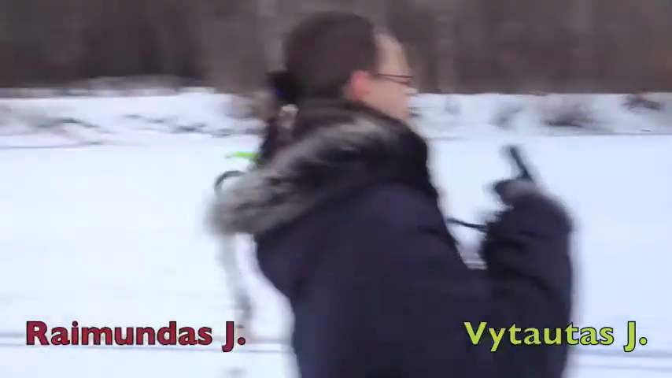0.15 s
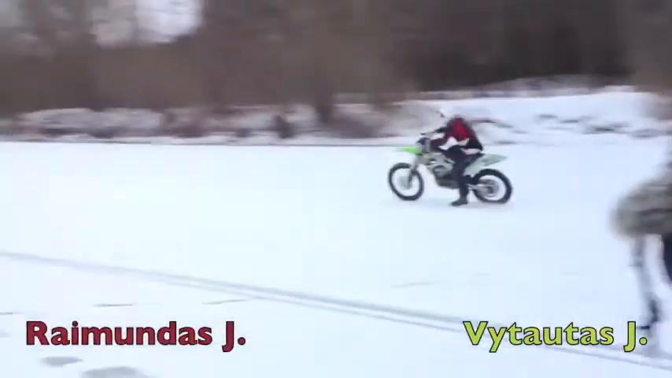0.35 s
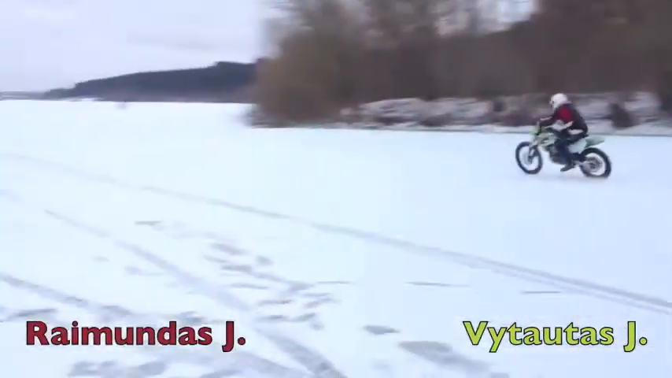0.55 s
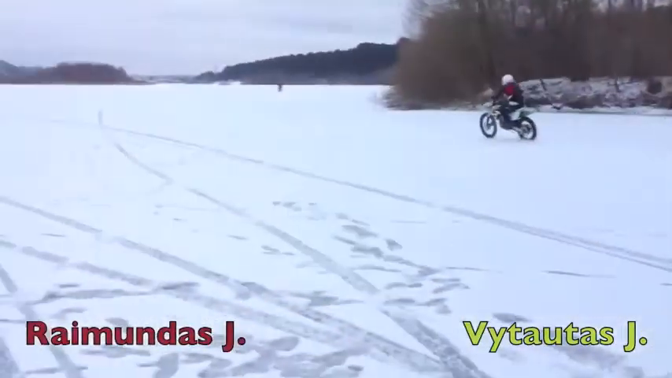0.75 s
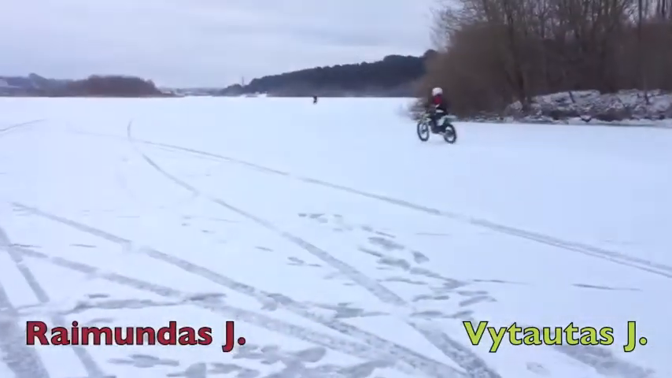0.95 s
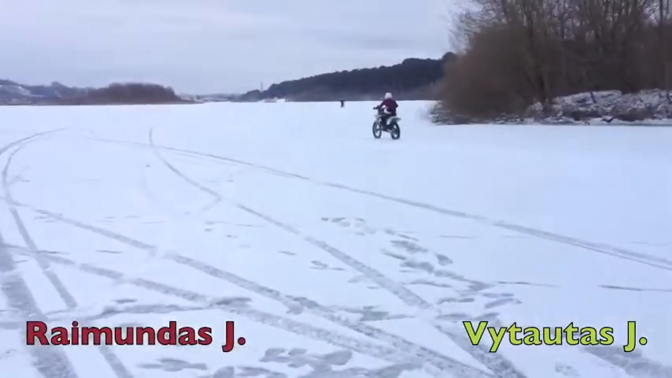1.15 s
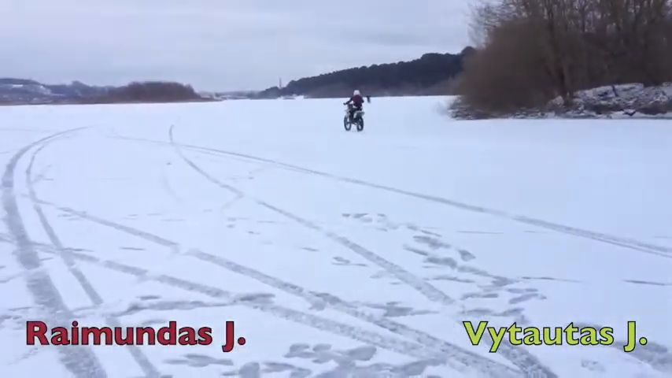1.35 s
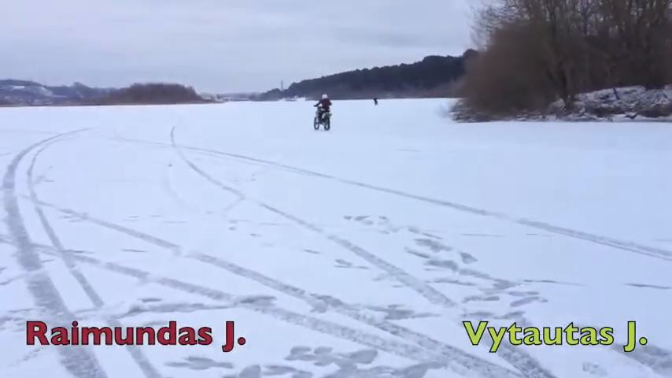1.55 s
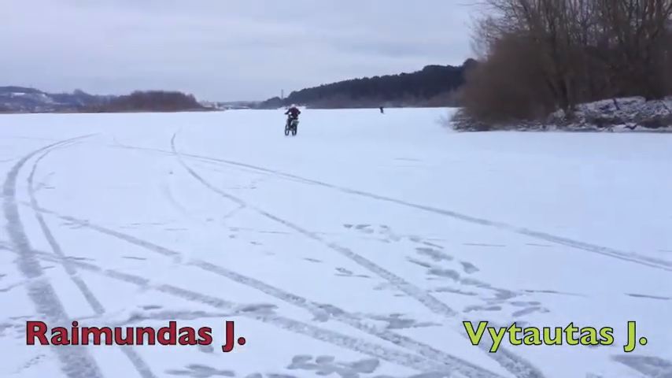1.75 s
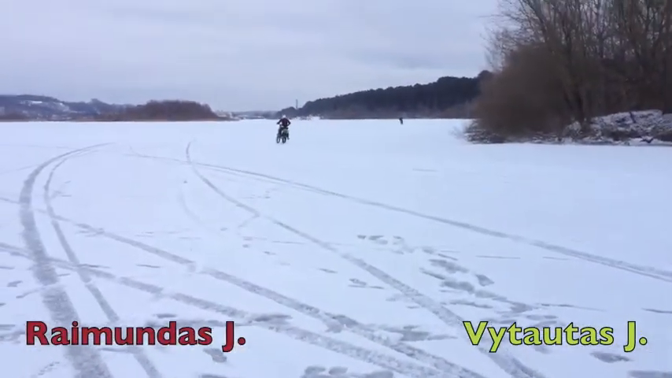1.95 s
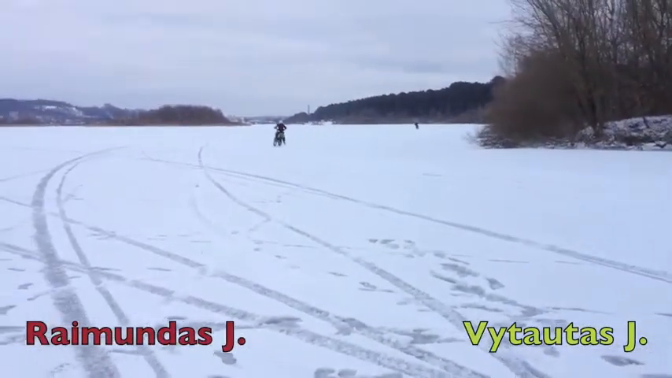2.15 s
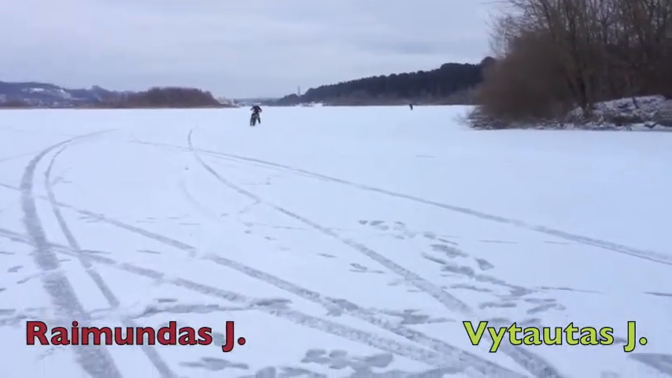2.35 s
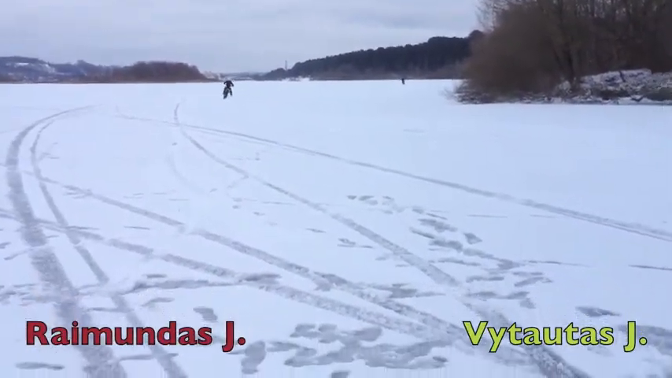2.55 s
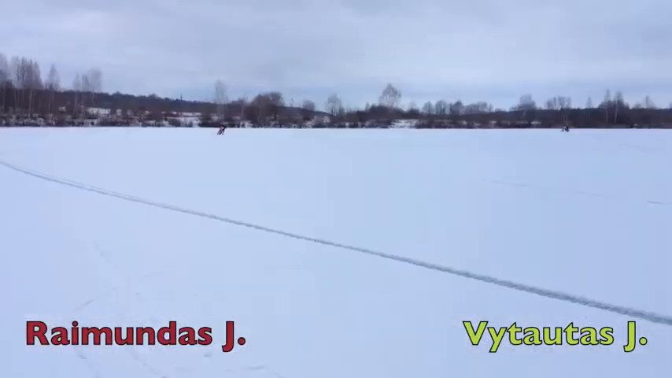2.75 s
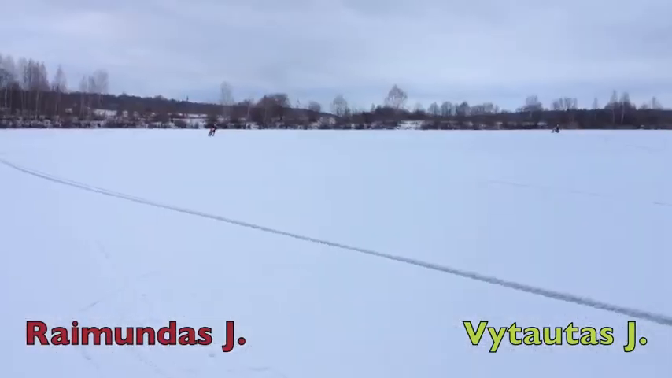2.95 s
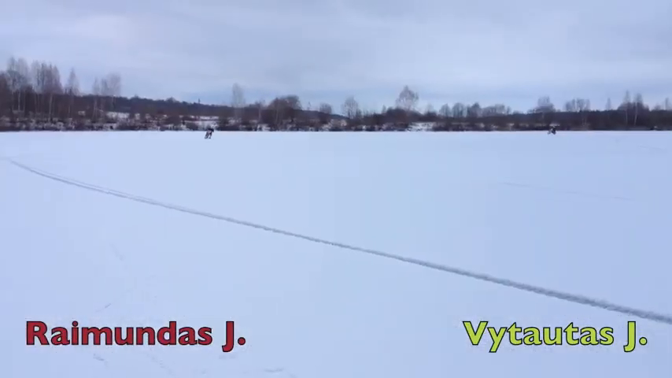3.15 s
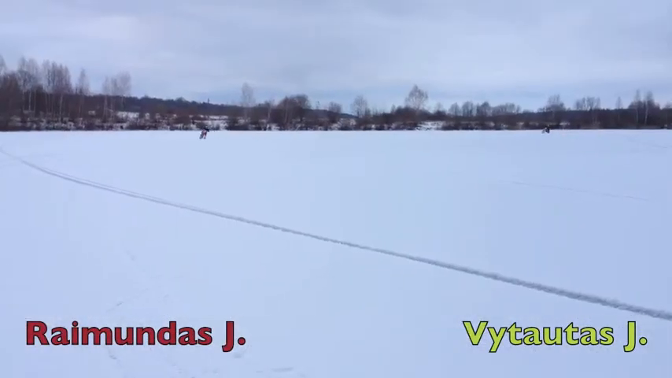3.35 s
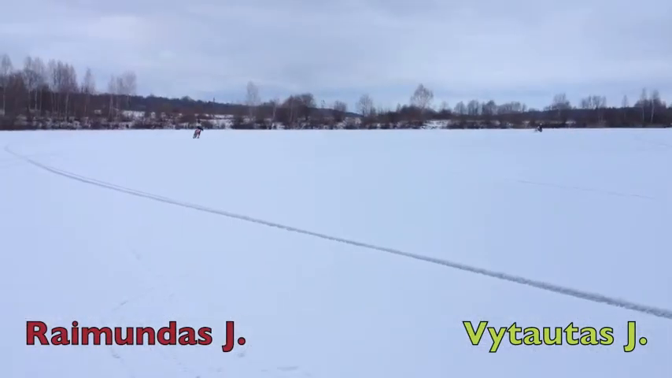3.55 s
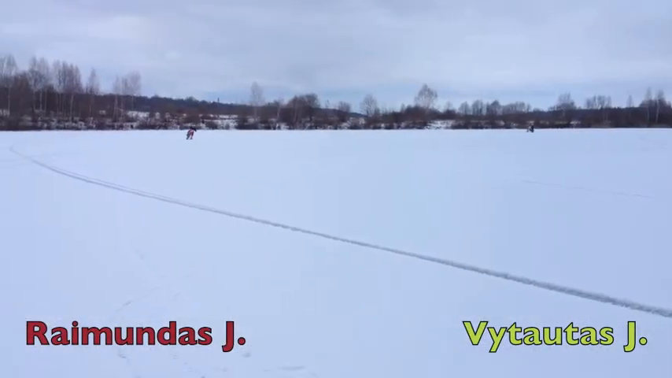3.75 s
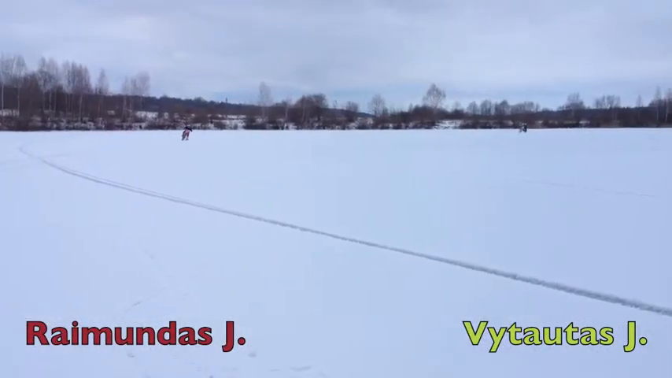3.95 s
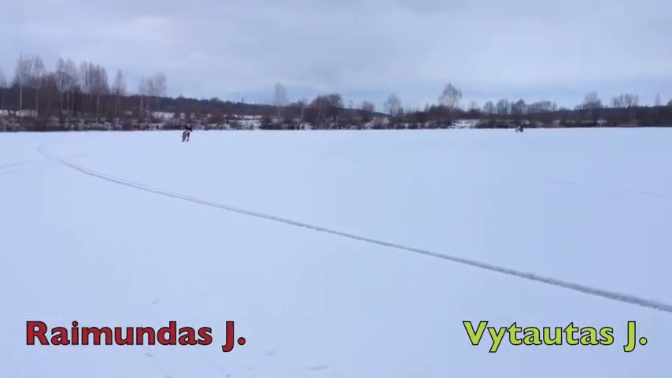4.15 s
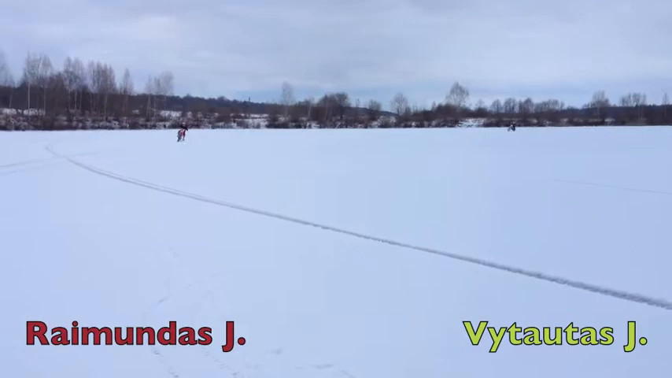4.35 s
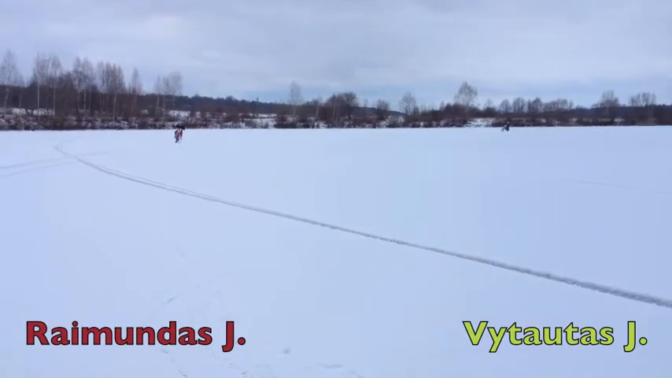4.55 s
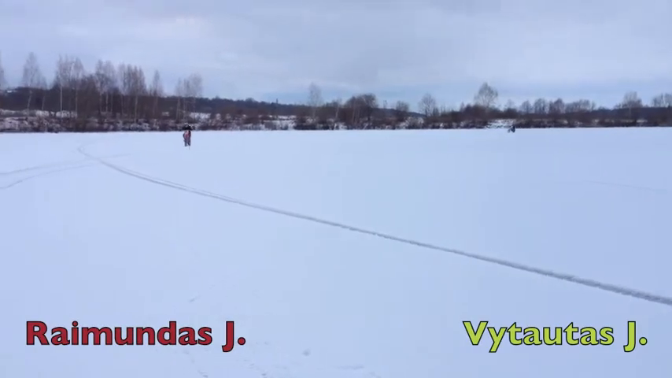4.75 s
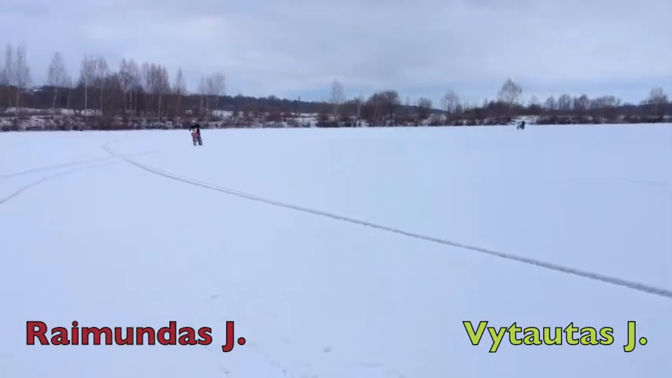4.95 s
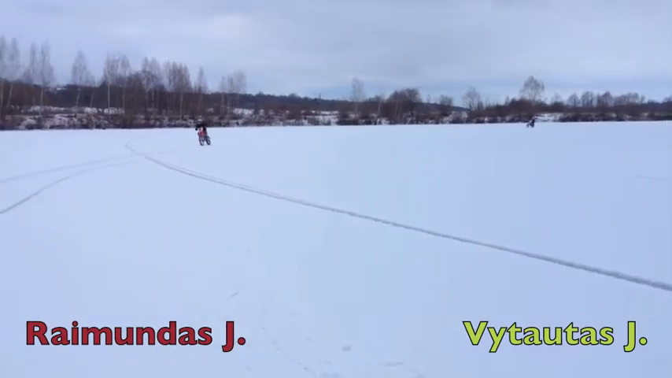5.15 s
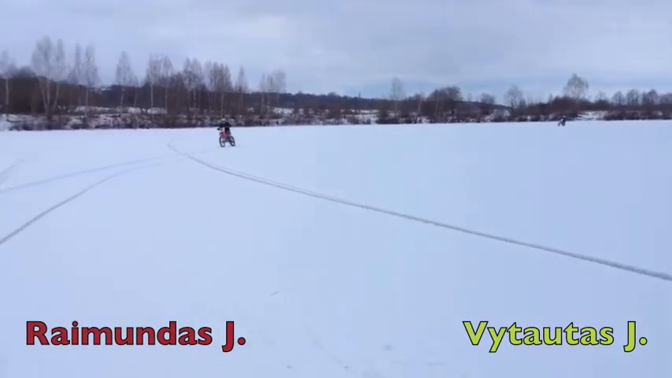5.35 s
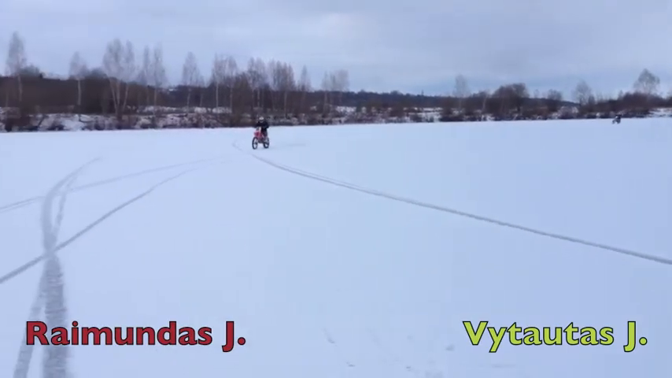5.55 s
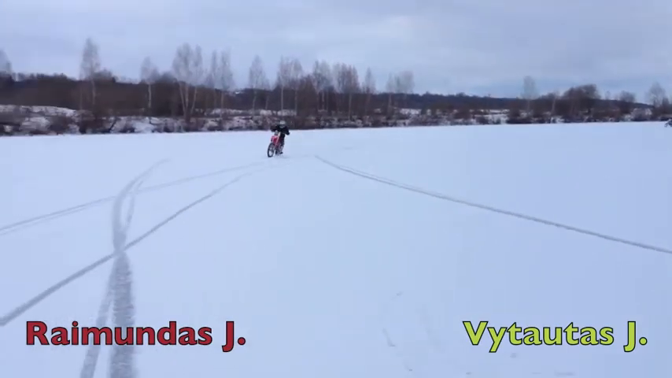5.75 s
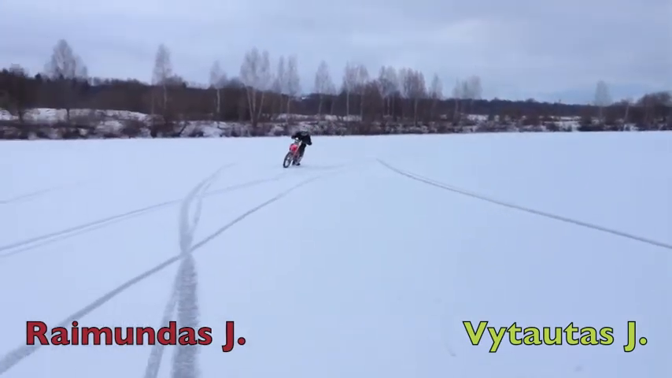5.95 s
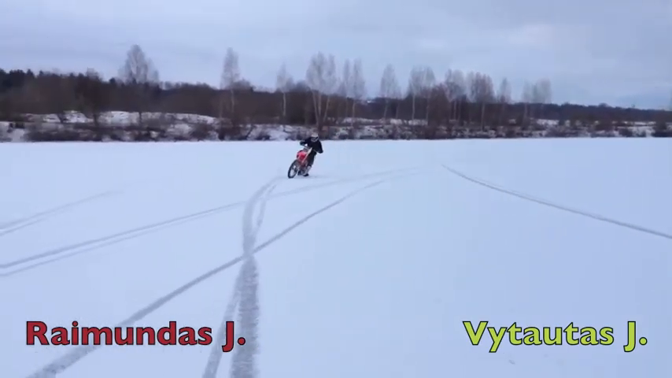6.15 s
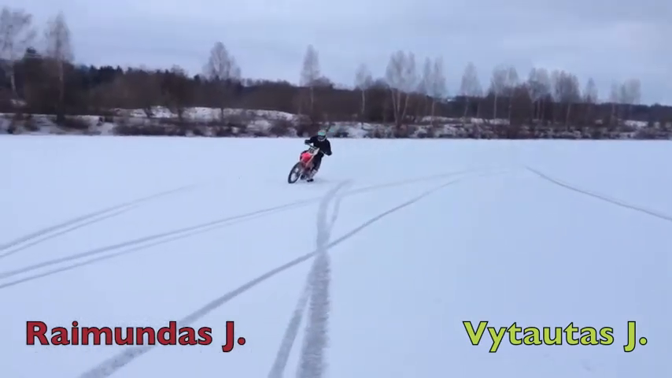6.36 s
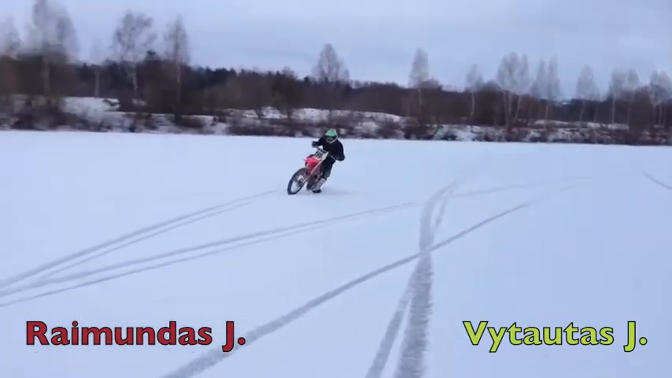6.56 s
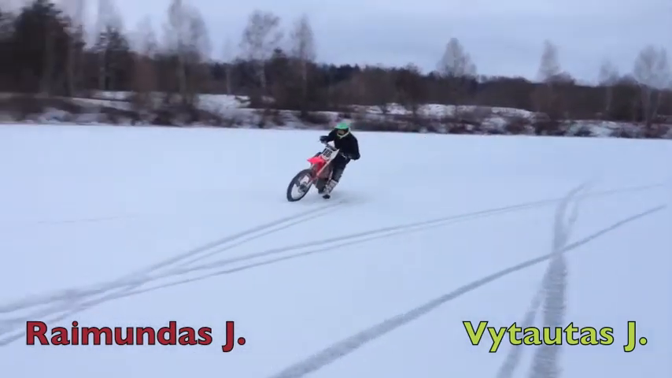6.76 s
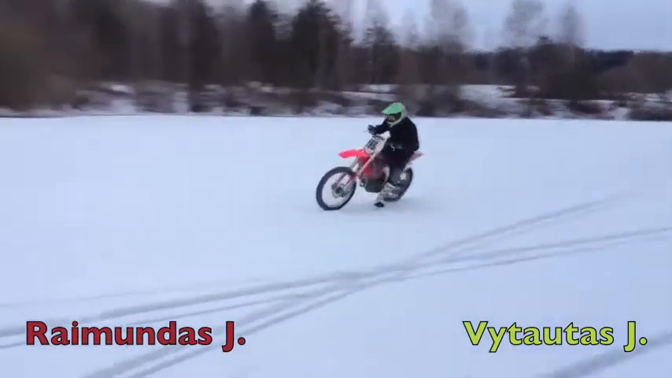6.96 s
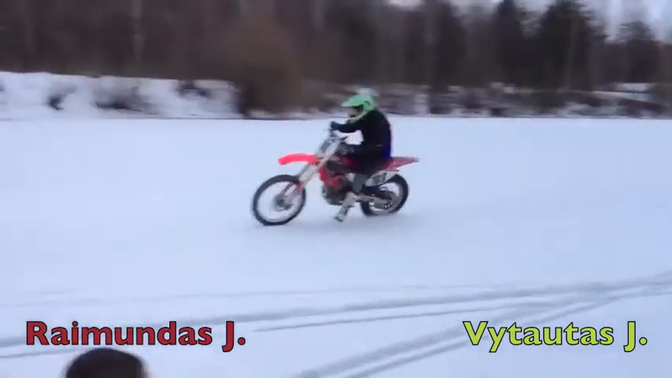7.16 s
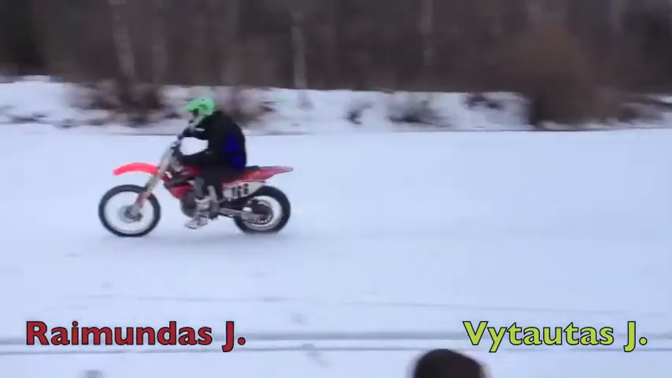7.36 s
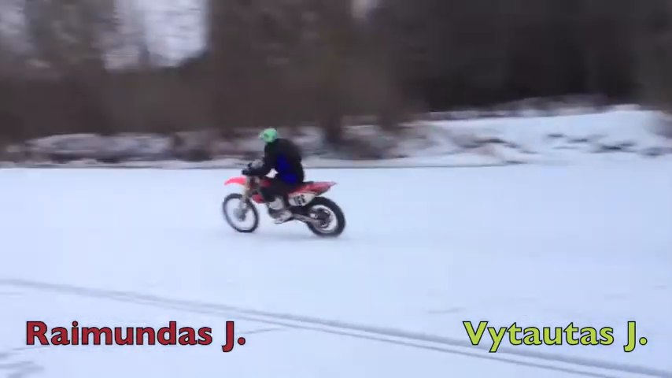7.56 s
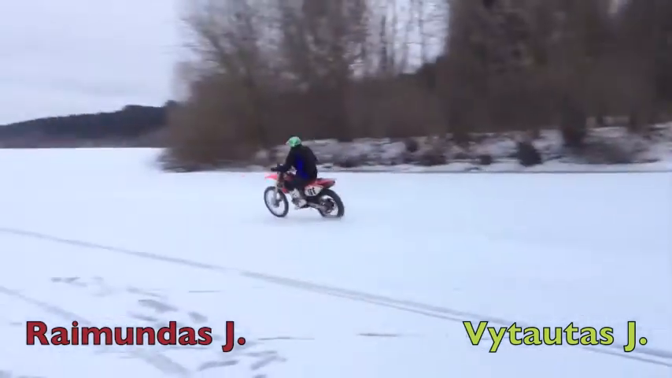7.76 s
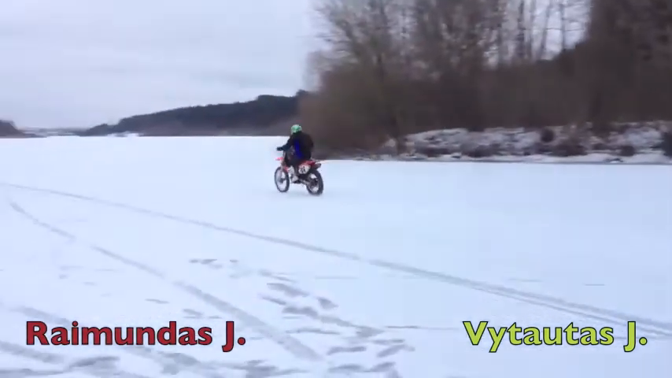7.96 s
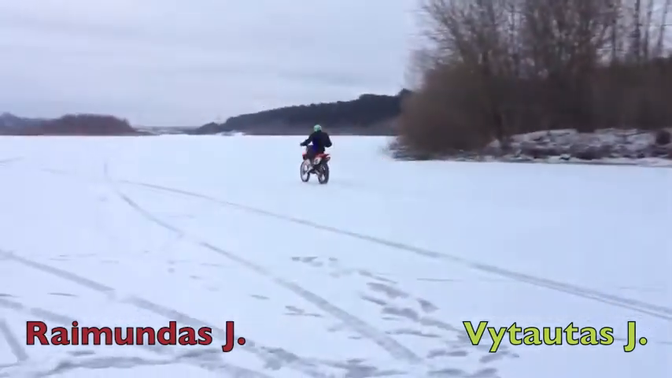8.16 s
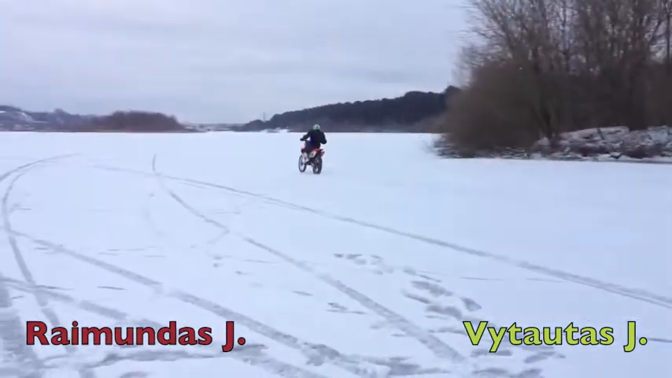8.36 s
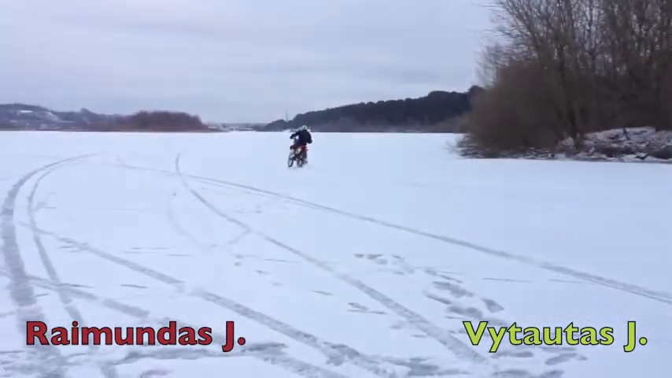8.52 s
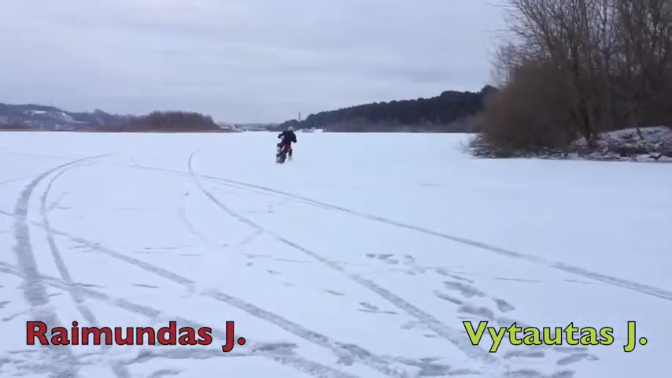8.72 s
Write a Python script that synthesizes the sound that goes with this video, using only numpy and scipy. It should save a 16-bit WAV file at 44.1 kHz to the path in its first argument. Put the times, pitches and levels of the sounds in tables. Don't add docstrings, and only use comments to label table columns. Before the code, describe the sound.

A harsh four-stroke motorcycle drone starts near and moves off across open snow, falls suddenly quieter and lower, pops, and pulls again. The sound cuts to another bike, distant and higher, growing louder with gear whine and tyre roar. It blips off throttle, sweeps past, turns to sharper exhaust crackle, slows, then accelerates away. Faint distant engine hum and light wind reach a small microphone.

```python
import sys
import numpy as np
from scipy import signal
from scipy.fft import rfft, irfft, next_fast_len
from scipy.io import wavfile
from scipy.ndimage import uniform_filter1d, map_coordinates

SR = 44100
rng = np.random.default_rng(int(sys.argv[2]) if len(sys.argv) > 2 else 0)


def put_to_file(sound):
    columns = np.atleast_2d(sound).T
    safe = np.clip(columns, -1, 1)
    whole_steps = np.round(safe * 32767)
    wavfile.write(sys.argv[1], SR, whole_steps.astype(np.int16))


def voltage_ratio(level):
    return 10 ** (np.asarray(level, float) / 20)


N = 387638
CUT = 2.619


def evened(x):
    return x / np.sqrt(np.mean(x ** 2) + 1e-20)


def columns(rows):
    s, *values = np.transpose(rows)
    return [np.interp(np.arange(N) / SR, s, v) for v in values]


def shaped(x, points, lo_hz=0, hi_hz=SR, soft=.09):
    size = next_fast_len(N)
    log_hz = np.log(np.fft.rfftfreq(size, 1 / SR) + 1)
    f, db = np.transpose(points)
    lower = np.tanh((log_hz - np.log(lo_hz + 1)) / soft)
    upper = np.tanh((log_hz - np.log(hi_hz)) / soft)
    band = np.sqrt((lower - upper) / 2)
    gain = band * voltage_ratio(np.interp(log_hz, np.log(f + 1), db))
    return irfft(rfft(x, size) * gain, size)[:N]


def causal(x, points):
    log_hz = np.log(abs(np.fft.fftfreq(4096, 1 / SR)) + 1)
    f, db = np.transpose(points)
    log_gain = np.log(voltage_ratio(np.maximum(np.interp(log_hz, np.log(f + 1), db), -70)))
    taps = np.fft.ifft(np.exp(np.conj(signal.hilbert(log_gain)))).real[:2048]
    return signal.oaconvolve(x, taps)[:N]


def drift(seconds):
    size = max(round(seconds * SR / 64), 2)
    slow = uniform_filter1d(uniform_filter1d(rng.standard_normal(N // 64 + 2), size), size)
    return np.interp(np.arange(N) / 64, np.arange(len(slow)), evened(slow))


def controls():
    # t/s, rate/Hz
    speed = [
        [(0, 69.1), (.29, 69.2), (.5, 68.9), (.83, 68.7), (1, 71.3), (1.39, 67.4), (1.44, 62.9), (1.5, 57.2),
         (1.66, 50.1), (2.1, 47.3), (2.2, 51.2), (2.36, 56.7), (2.49, 60.6), (2.58, 60.8), (2.62, 62.3)],
        [(2.62, 66.34), (2.88, 69.34), (3.44, 68.53), (3.87, 74.88), (4.35, 75.61), (4.68, 74.46),
         (4.99, 61.24), (5.08, 65.5), (5.16, 71.72), (5.4, 79.42), (5.61, 74.52), (6.74, 75.79), (7.12, 71.89),
         (7.86, 65.31), (8.0, 54.6), (8.26, 55.5), (8.57, 59.49), (8.79, 67.66)],
    ]
    # t/s, level/dB, distance/m, exhaust facing the microphone/0-1, wheelspin/0-2
    ride_away = [(0, -33.5, 8.1, 0.81, 0.8), (.15, -36, 6.2, 0.84, 0.26), (.3, -28.5, 7.5, 0.81, 0.86),
                 (.5, -34.5, 13.5, .9, 0.14), (.8, -33.5, 19.5, 0.96, 0.28), (1, -36.5, 21.4, 0.92, 0.2),
                 (1.2, -36.5, 63, 0.87, 0.15), (1.38, -39, 53, .94, 0.16), (1.45, -48.5, 33, 0.65, 0.076),
                 (1.7, -53.5, 31, 0.88, 0.34), (2.1, -53, 31, 1, 0.62), (2.25, -44.5, 38, 0.72, 1.5),
                 (2.4, -38, 33, 0.7, 1.6), (2.5, -38.5, 47, 0.81, 1.54), (2.62, -43, 110, .68, 2.1)]
    ride_past = [(2.62, -44, 146, 0.07, 1.1), (3.0, -44.5, 117, 0.073, 0.57), (3.5, -41, 138, 0.083, 0.72),
                 (4.3, -37.5, 122, 0.3, 1.15), (4.7, -35.5, 108, 0.16, 0.46), (5.0, -37, 60, 0.35, 0.22),
                 (5.2, -35.5, 57, 0.33, 0.21), (5.4, -34.5, 42, 0.34, 0.25), (5.6, -38, 29, 0.26, 0.0061),
                 (6.2, -30.5, 40, 0.12, 0.27), (6.8, -29, 21.2, 0.08, 0.27), (7.15, -31, 2.1, 0.53, 0.068),
                 (7.45, -33.5, 7.7, 0.83, 0.071), (7.85, -36, 11.7, 0.89, 0.073),
                 (8.05, -39.5, 36, 0.41, 0.44), (8.35, -38.5, 35, 0.82, 0), (8.55, -37.5, 61, 0.93, 0.29),
                 (8.79, -37, 66, 0.95, 0.48)]
    # opens t/s, shuts t/s
    openings = [
        (-1, 1.395),
        (2.2, 4.71),
        (5.03, 7.885),
        (8.25, 10),
    ]
    # t/s, share of full throttle/1
    pops = [
        (1.48, .8),
        (2.172, 1),
    ]
    opening_s, shutting_s, pop_s = .1, .022, .015
    shut_facing = .45
    t = np.arange(N) / SR
    level_db, metres, facing, spin = columns(np.vstack([ride_away, ride_past]))
    throttle = 0
    for opens, shuts in openings:
        rise = np.clip((t - opens) / opening_s, 0, 1)
        throttle = throttle + rise * np.clip(1 + (shuts - t) / shutting_s, 0, 1)
    for s, share in pops:
        throttle = throttle + share * np.exp(-((t - s) / pop_s) ** 4)
    throttle = np.clip(throttle, 0, 1)
    clear = throttle + shut_facing * (1 - throttle)
    return dict(rate=columns(np.vstack(speed))[0], level_db=level_db, metres=np.maximum(metres, 3),
                behind=np.clip(facing, 0, 1), spin=np.clip(spin, 0, 3), shut=1 - throttle,
                facing=np.clip(facing * clear, .05, .97))


def pipe(turns, ride):
    # f/Hz, level/dB from the front, level/dB from behind
    pipe_gain = [(90.0, -12, -9.5), (140.0, 5.5, 7.7), (198.4, -2, 9), (232.6, 12.5, 10), (291.6, 11.5, 9),
                 (339.5, -5.5, 11.5), (455, -17, -2), (600.0, -27, -10.5)]
    # t/s, half length/s, f/Hz, level/dB
    lobes = [(0, 0.84, 394, -16.5), (0.127, .15, 257, 13.5), (0.79, 0.37, 246, -13), (1.78, 0.5, 148, 11),
             (2.15, 0.48, 248, -7), (3.89, 0.83, 216, 3), (4.89, 0.13, 303, -22), (5.28, 0.24, 228, 9.5),
             (6.418, 0.8, 377, 11.5), (7.605, 0.24, 216, -20), (0.48, 0.11, 605, -2), (3.1, 0.26, 420, 2),
             (4.2, 0.95, 524, -29), (5.4, 0.29, 600, 0), (6.414, 0.64, 605, 17.5), (7.28, 0.13, 400, -15),
             (7.49, 0.3, 760, 15), (8.4, 0.22, 464, 6), (7.95, 0.041, 258, -0.5), (0, .15, 152, 3.5),
             (8.75, 0.22, 600, 7.5)]
    # f/Hz, level/dB per Hz
    rumble = [(12, -84), (20, -74), (92, -18), (135, -2), (222, 1.5), (256, 0.5), (295, -1), (541, -21),
              (900, -16.5), (1170, -33), (1980, -120)]
    lobe_width = .19
    rate, t = ride["rate"], np.arange(N) / SR
    slow, slow_rate = t[::64], rate[::64]
    ahead = np.clip(np.maximum((.6 - ride["facing"]) / .3, 2 * ride["spin"] - 1.8), 0, 1)
    hz, front_db, behind_db = np.transpose(pipe_gain)
    tones, power = 0, 0
    for k in range(1, 13):
        order_hz = k * rate
        front = np.interp(np.log(order_hz), np.log(hz), front_db)
        behind = np.interp(np.log(order_hz), np.log(hz), behind_db)
        db = ride["level_db"] - 4 * ride["shut"] + front + (behind - front) * ride["behind"]
        if k == 1:
            db += -17 + 6 * ahead
        if k > 5:
            db += -1.5 * (k - 5) - 7.5 * (ride["metres"] / 100 - .4)
        echo_db = 0
        for s, half, f, gain_db in lobes:
            off_centre = (k * slow_rate / f - 1) / lobe_width
            echo_db = echo_db + gain_db * np.exp(-((slow - s) / half) ** 2 - off_centre ** 2)
        db += np.interp(t, slow, echo_db)
        power = power + voltage_ratio(db) ** 2
        lag = .7 + .25 * k + 1 + np.tanh((order_hz - 320) / 25)
        lag = lag + 1.1 * ahead * (1 + np.tanh((order_hz - 185) / 15))
        level = voltage_ratio(db + drift(.03))
        tones = tones + level * np.cos(2 * np.pi * k * turns - lag + .04 * k * drift(.03))
    rough_db = -15 + 11.5 * ride["shut"] - 4 * ahead + 3 * ride["spin"]
    rough = voltage_ratio(rough_db) * np.sqrt(power) * evened(shaped(rng.standard_normal(N), rumble))
    return np.sqrt(2) * tones + rough


def cracks(turns, ride):
    # f/Hz, level/dB per Hz
    crack_colour = [(400, -39.5), (700, -13), (1200, 12.5), (1700, 1), (2300, -1.5), (3300, -20.5),
                    (4600, -35.5), (7400, -28.5), (9550, -47), (13000, -24.5), (15600, -24)]
    # t/s, f/Hz
    mouth = [(0, 2300), (.5, 1890), (1.0, 2102), (1.4, 2190), (2.4, 2500), (2.64, 1840), (7.2, 2170),
             (7.5, 2550), (7.8, 2870), (8.35, 2170), (8.6, 2630), (8.79, 2320)]
    rate, facing = ride["rate"], ride["facing"]
    cycle = turns.astype(int)
    luck = rng.standard_normal((800, 6))[cycle]
    since = (turns - cycle - .3) / rate + .00006 * luck[:, 0]
    length = (.0023 - .0012 * facing) * voltage_ratio(1.6 * luck[:, 1])
    u = np.maximum(since / (.6 * length), 0)
    puff = u * np.exp(-u) / np.sqrt(length * rate / 4) * rng.standard_normal(N)
    click = np.sinc(since * 32000) * np.exp(-(since / .0004) ** 2)
    burst = np.exp(-(since - .0008) ** 2 / (.6 * length) ** 2) / np.sqrt(length)
    mouth_hz = columns(mouth)[0] * voltage_ratio(.8 * luck[:, 0])
    ring = burst * np.cos(2 * np.pi * mouth_hz * since + 9 * luck[:, 4])
    upper_hz = np.where(np.arange(N) / SR > CUT, 6900, 5000) * voltage_ratio(1.08 * luck[:, 5])
    overtone = burst * np.cos(2 * np.pi * upper_hz * since + 9 * luck[:, 3])
    puff = snow(causal(puff, crack_colour), ride)
    click = snow(causal(click, crack_colour), ride)
    return puff, click, ring, overtone, luck


def engine_roar(turns, ride):
    # f/Hz, level/dB per Hz
    roar_colour = [(440, -14.5), (750, -7.5), (1080, 9), (1890, 2.5), (2180, 11.5), (2500, -1.5),
                   (3030, -7), (3950, -32.5), (5160, -28.5), (6490, -20.5), (7550, -26), (9740, -49.5),
                   (11500, -51), (14100, -45), (15600, -55)]
    # f/Hz, level/dB per Hz
    spray_colour = [(1500, -38), (3400, -31.5), (4600, -17.5), (5600, -29.5), (8200, -50), (9700, -55),
                    (12800, -47), (15500, -66)]
    throb = 1 + .12 * np.cos(2 * np.pi * (turns - .4)) + .022 * np.cos(4 * np.pi * (turns - .35))
    roar = rng.standard_normal(N) * throb
    spray = ride["spin"] * causal(rng.standard_normal(N), spray_colour)
    return snow(causal(roar, roar_colour) + spray, ride)


def band_levels(ride):
    # level/dB, throttle shut/dB, distance/dB per 100 m, facing/dB, wheelspin/dB
    treble_law = [
        (16, -4.5, -1.5, 0.3, -7.5),
        (9.5, -6.5, 4, 5.5, -8),
        (7.5, -4.5, -9, 0.86, -2.5),
        (-6, -1.5, -31.5, 2.8, 6),
    ]
    treble_shift = [
        (-8, -3, 0.04),
        (1.33, 1.93, 0.81),
        (1.76, 1, 0.71),
        (3.3, 2.1, 0.77),
    ]
    # t/s, half length/s, level/dB
    swells = [
        (0.113, 0.12, -3),
        (1.352, 0.044, 4),
        (2.41, 0.17, 5),
        (3.91, 0.097, -3),
        (4.216, 0.13, 6.5),
        (5.514, 0.17, 4),
        (6.887, 0.19, -1),
        (7.36, 0.38, 2.5),
        (7.86, 0.073, -3.5),
    ]
    t = np.arange(N) / SR
    second = t > CUT
    doublings = np.log2(ride["metres"] / 20)
    swell_db = sum(db * np.exp(-((t - s) / half) ** 2) for s, half, db in swells)
    levels = []
    for law, shift in zip(treble_law, treble_shift):
        db, shut_db, far_db, facing_db, spin_db = law
        second_db, climb_db, lift = shift
        level = ride["level_db"] + db + swell_db * lift + shut_db * ride["shut"]
        level = level + far_db * ride["metres"] / 100 + facing_db * ride["behind"] + spin_db * ride["spin"]
        levels.append(level + second_db * second + climb_db * ride["behind"] * doublings)
    return levels


def treble(turns, ride):
    band_edges_hz = [450, 1700, 3700, 9500, 15400]
    # f/Hz, level/dB
    even_spectrum = [(20, 0), (20000, 0)]
    facing = ride["facing"]
    puff, click, ring, overtone, luck = cracks(turns, ride)
    roar = engine_roar(turns, ride)
    share = .096 + .17 * ride["metres"] / 100
    share = np.maximum(share, 1.75 * facing - .68)
    bright = evened(overtone) + .52 * evened(shaped(click, even_spectrum, 3800, 9500))
    steady = [click, ring, bright, click]
    alikes = [.95, .75, .55, .3]
    kept = [1, 1, .93 * facing ** .4, .55 * facing ** .4]
    shimmer = drift(.053)
    out = np.zeros(N)
    for k, db in enumerate(band_levels(ride)):
        limits = band_edges_hz[k:k + 2]
        roar_k = evened(shaped(roar, even_spectrum, *limits))
        puff_k = evened(shaped(puff, even_spectrum, *limits))
        steady_k = evened(shaped(steady[k], even_spectrum, *limits))
        alike, part = alikes[k] * facing, np.clip(share * kept[k], 0, .98)
        size_db = (.8 + 2.2 * ride["spin"] * facing) * luck[:, 2] + (.3 + .55 * k) * luck[:, 3 + k % 3]
        crack = evened(voltage_ratio(size_db)) * (np.sqrt(alike) * steady_k + np.sqrt(1 - alike) * puff_k)
        band = np.sqrt(part) * crack + np.sqrt(1 - part) * roar_k
        local_rms = np.sqrt(uniform_filter1d(band ** 2, 9000))
        out += voltage_ratio(db + .35 * (k + .6) * shimmer) * band / local_rms
    return out


def whine(turns, ride):
    faster = ride["rate"] - 75
    db = ride["level_db"] - 5 + 1.1 * faster - 8 * ride["shut"]
    front = np.clip((.55 - ride["behind"]) / .15, 0, 1)
    tones = 0
    for order, order_db in [(14, 3), (13, -3), (12, -7)]:
        level = voltage_ratio(db + order_db + (14 - order) * .5 * faster + drift(.05))
        tones = tones + level * np.cos(2 * np.pi * order * turns + .15 * drift(.04))
    return front * tones


def snow(x, ride):
    # f/Hz, level/dB
    snow_echo = [(500, -14), (1200, -10), (2600, 0), (4500, -1), (6000, -6), (9000, -18)]
    metres = ride["metres"]
    notch_hz = 1750 * (1 - np.exp(-metres / 18))
    strength = (.4 + (.76 - .4) * ride["facing"]) * (1 - np.exp(-(metres / 8) ** 2))
    late = map_coordinates(x, [np.arange(N) - SR / (2 * notch_hz)], order=1, mode="nearest")
    return x + strength * shaped(late, snow_echo)


def far_bike():
    # t/s, third order f/Hz, level/dB
    far_hums = [
        [(0.0, 223.8, -57), (0.03, 224.1, -27), (0.576, 224.0, -48), (0.884, 222.0, -43), (0.896, 220.4, -46),
         (1.0, 217.3, -18)],
        [(2.7, 166.0, -47), (2.82, 172.4, -59), (3.76, 175.0, -56), (3.96, 171.2, -65), (4.39, 179.0, -68),
         (4.54, 167.2, -66), (4.88, 169.6, -60), (5.0, 183.4, -31)],
    ]
    far_orders = [(2, -2.5), (3, 8.5), (4, -2.5), (5, -11)]
    t = np.arange(N) / SR
    out = 0
    for rows in far_hums:
        hz, db = columns(rows)
        heard = np.clip(np.minimum(t - rows[0][0] + .1, rows[-1][0] - t) / .3, 0, 1)
        turns = np.cumsum(hz / 3) / SR
        for k, order_db in far_orders:
            level = voltage_ratio(db + 6 + order_db + .5 * drift(.026))
            out = out + heard * level * np.cos(2 * np.pi * k * turns + .15 * drift(.11))
    return out


def wind():
    # t/s, level/dB
    gusts = [(.1, -68), (.38, -80), (.6, -68), (.81, -53), (1.0, -64), (1.33, -63), (2.37, -71),
             (5.62, -70), (5.95, -72), (6.41, -65), (6.7, -68), (7.1, -71), (7.71, -48), (8.3, -73),
             (8.57, -56), (8.79, -39)]
    calm_db, gust_s = -89, .07
    lumps = shaped(rng.standard_normal(N), [(15, -26), (40, -21), (90, -4), (200, -28), (500, -38)])
    t = np.arange(N) / SR
    strength = voltage_ratio(calm_db) + sum(voltage_ratio(db) * np.exp(-((t - s) / gust_s) ** 2) for s, db in gusts)
    return strength * evened(lumps)


def scene():
    ride = controls()
    second = np.arange(N) / SR > CUT
    turns = np.cumsum(ride["rate"] * (1 + .002 * drift(.03))) / SR + .88 + .81 * second
    near = pipe(turns - .33, ride) + treble(turns, ride) + whine(turns, ride)
    return (near + far_bike() + wind())[None]


def low_pass(x):
    return signal.sosfilt(signal.butter(12, 15720, fs=SR, output="sos"), x)


def record(dry):
    fade_s, fade_db, dip_s = .08, -10, .032
    away = abs(np.arange(N) / SR - CUT)
    join = np.clip(away / dip_s, 0, 1) * voltage_ratio(fade_db * np.clip(1 - away / fade_s, 0, 1))
    return low_pass(0.77 * np.tanh(dry / 0.95) * join)


dry = scene()
out = record(dry)
put_to_file(out)
```